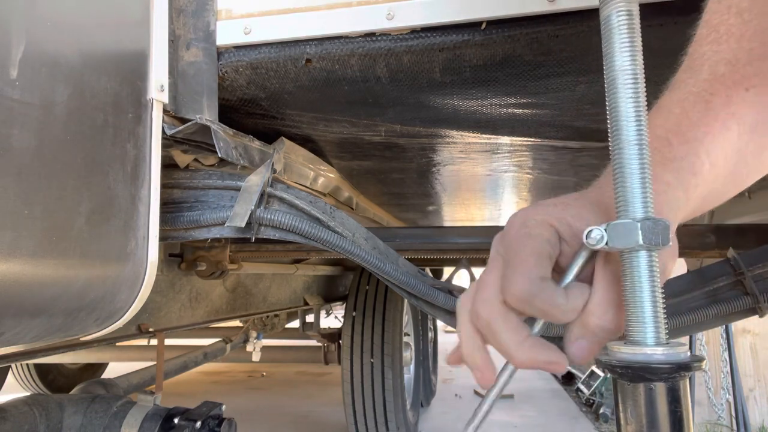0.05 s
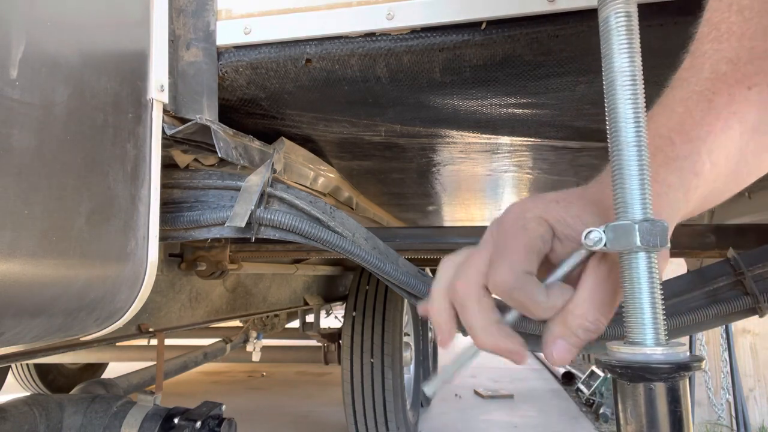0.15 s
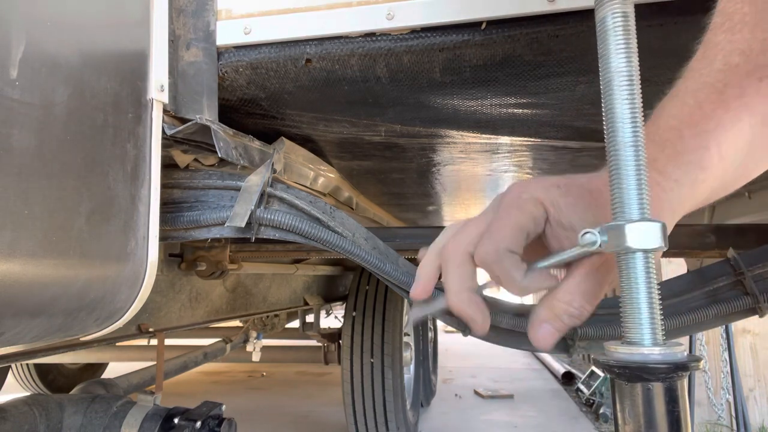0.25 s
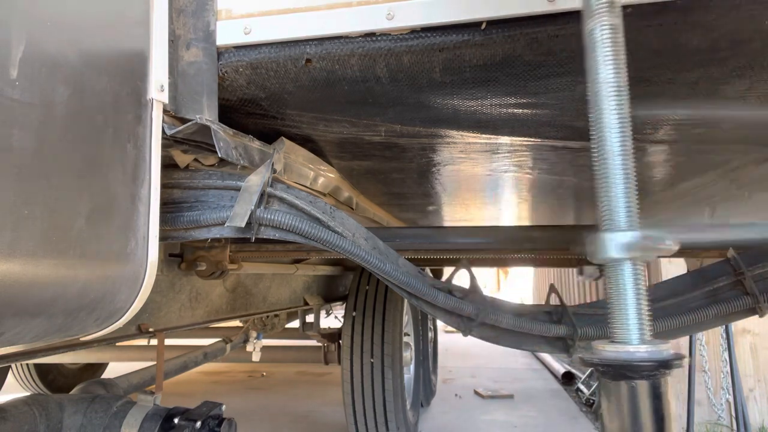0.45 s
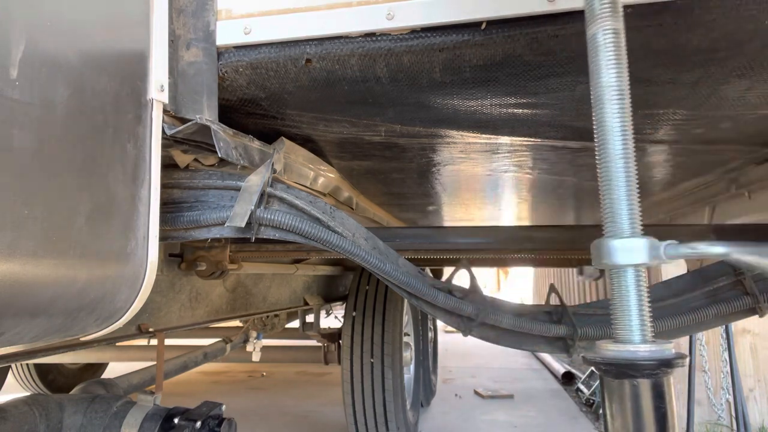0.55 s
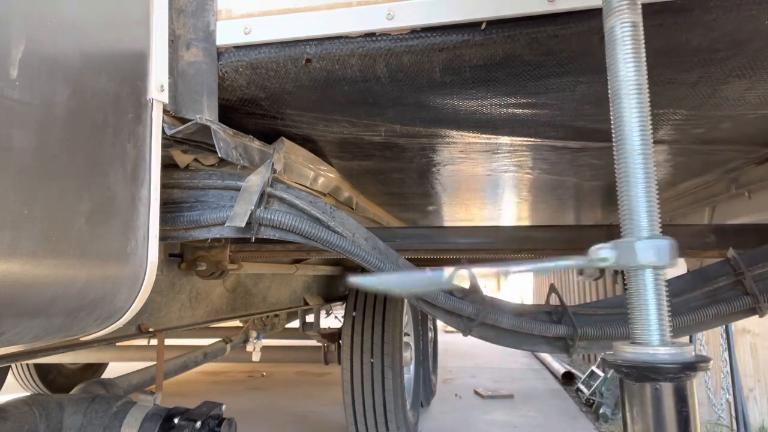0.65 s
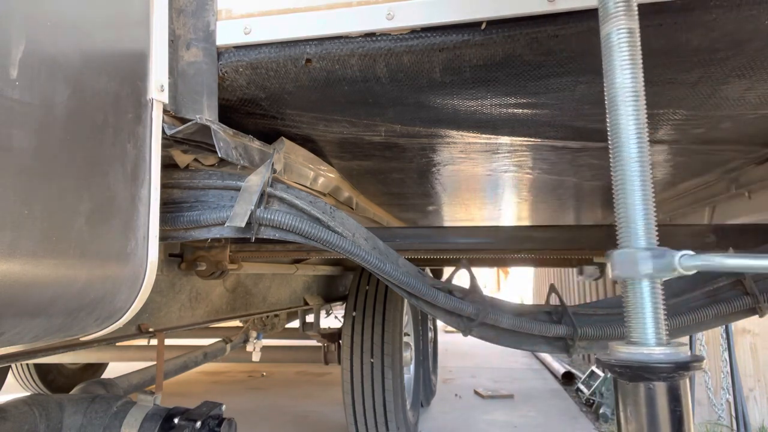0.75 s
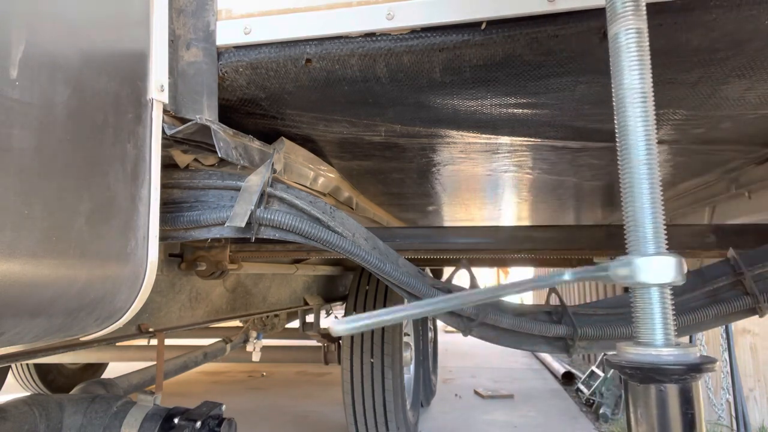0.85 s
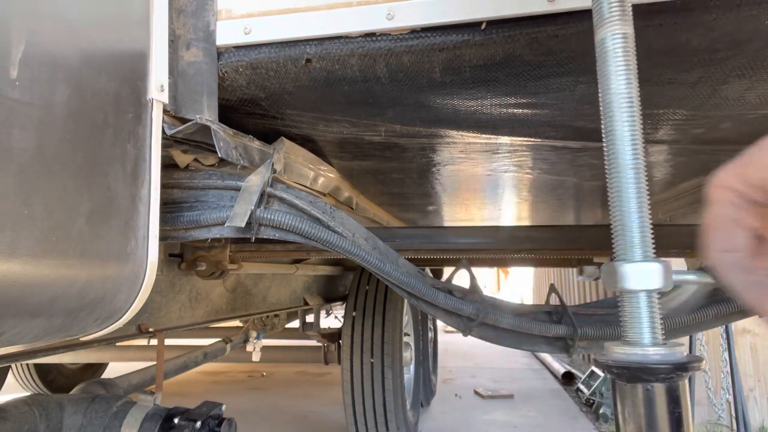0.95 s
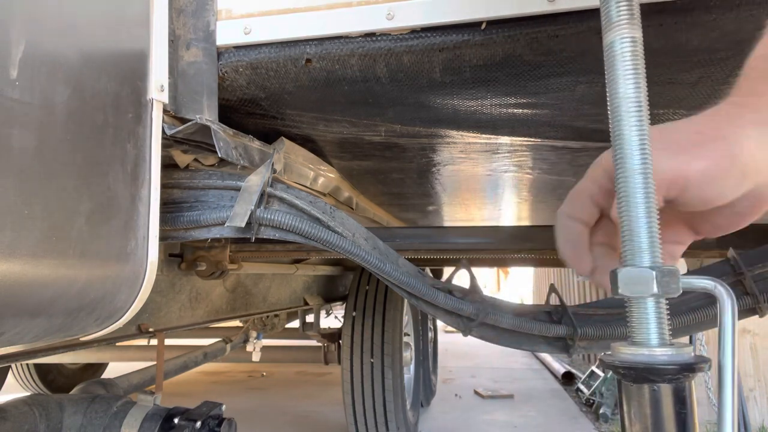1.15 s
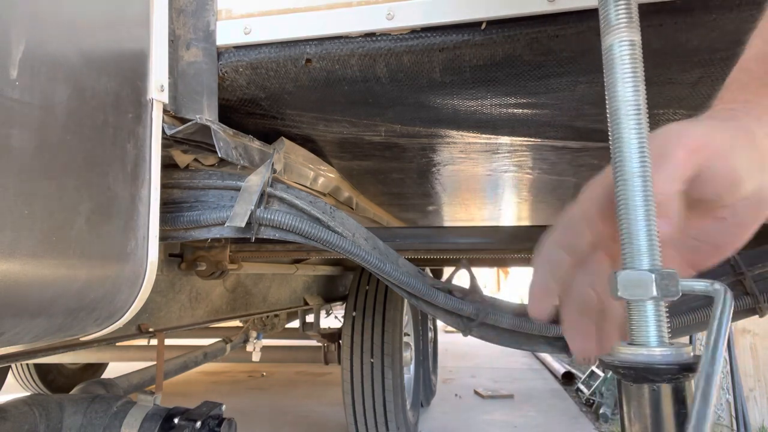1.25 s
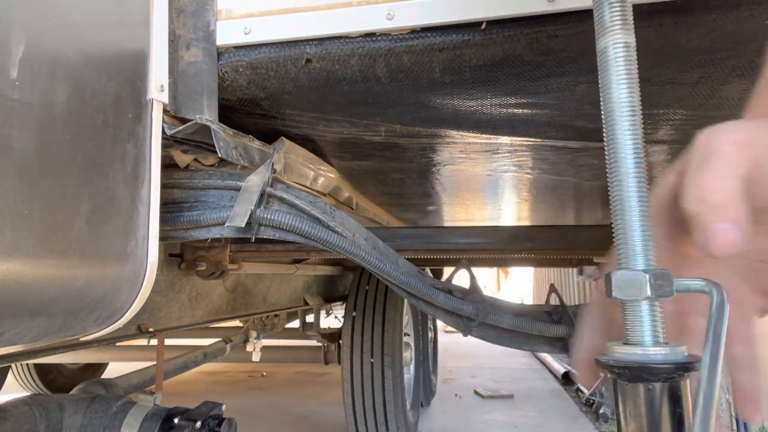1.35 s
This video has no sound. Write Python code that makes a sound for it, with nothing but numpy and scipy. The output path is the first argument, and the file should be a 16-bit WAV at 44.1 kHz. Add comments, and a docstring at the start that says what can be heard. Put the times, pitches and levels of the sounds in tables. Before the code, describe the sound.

A steel crank on a threaded jack rod is flicked by hand: soft finger brush, tiny high squeak, a clink, then a dense burst of bright clashes and rattle thinning out. Close stereo microphone, quiet outdoors, distant birds.

```python
"""A distant dove coos and a small bird chirps over a low rumble; fingers brush a steel crank close by.
Flicked round the threaded rod of a trailer jack, its dry nut squeaks by stick-slip and the handle clinks.
Swinging free, it clashes on the rod and rattles along the thread until a hand catches it.
Force impulses excite the decaying modes of rod, handle and steelwork; a bending wave disperses as a sweep.
Ticks, brushes and air are filtered noise; the birds are gliding sines with an echo."""
import sys
import numpy as np
from scipy import signal
from scipy.fft import rfft, irfft
from scipy.io import wavfile

SR = 44100
rng = np.random.default_rng(int(sys.argv[2]) if len(sys.argv) > 2 else 0)


def waveform_to_disk(signal):
    """Save audio, clipped to [-1, 1], as 16-bit WAV at the path in sys.argv[1]."""
    frames = np.transpose(np.atleast_2d(signal))
    scaled = np.clip(frames, -1, 1) * 32767
    samples = np.round(scaled).astype(np.int16)
    wavfile.write(sys.argv[1], SR, samples)


N = 61739
T = np.arange(N) / SR   # time [s]

# The nut strikes the rod: (time [s], level [dB], extra below 4.5 kHz [dB], extra above 9 kHz [dB],
# resonance of the contact [Hz])
ROD_CLASHES = [(.3655, -30, -0.5, -32, 5440), (.3705, -28.5, -4, -32, 5680), (.388, -39, 11.5, -24.5, 3250),
               (.4428, -23.5, 6.5, -11, 2490), (.451, -14, -2.5, 5.5, 2380), (.4625, -13, -6, 3, 6120),
               (.471, -23.5, -6, 9.5, 5700), (.488, -23, -7, -17, 6080), (.4965, -19, -20, 9, 5820),
               (.504, -21, 2, 9, 7270), (.516, -21, -15.5, 11, 7500), (.5428, -23, 3, 3, 2566),
               (.556, -19, -7.5, -16, 5380), (.575, -28, -5, -20, 5700), (.583, -16, -17, -2, 7200),
               (.597, -24.5, 1, 2, 1020), (.66, -33, 0, 7.5, 3900), (.685, -32, -9, 13.5, 7100),
               (.703, -36, 4, 14.5, 6000), (.734, -30.5, -5.5, -22, 6020), (.774, -35, -4, 17, 7550),
               (.781, -38, 7.5, 9, 2390), (.797, -33, 1, -9, 3850), (.837, -38.5, 4.5, 6.5, 2890),
               (.985, -42, 6, 9, 4130)]
# Light knocks on the handle: (time [s], level [dB], extra below 4.5 kHz [dB], extra above 9 kHz [dB])
HANDLE_CLINKS = [(.3105, -33.5, 0, -10.5), (.971, -52.5, 11.5, -21), (1.017, -62, 10.5, -1),
                 (1.087, -55, 7.5, -8), (1.131, -52, 1, -13), (1.141, -44, 2.5, -16), (1.367, -64, 6, 6.5)]
# Strength of the nut's rattle along the thread: (time [s], level [dB])
RATTLE_LEVEL = [(.36, -46), (.39, -54), (.435, -32.5), (.46, -19), (.515, -30), (.535, -59), (.6, -37.5),
                (.64, -37), (.7, -36.5), (.76, -41), (.805, -37), (.83, -56.5), (.91, -53), (.96, -50),
                (1.04, -64), (1.2, -91.5)]
# Modes of rod and jack, one list per column: (frequency [Hz]), (level [dB]), (decay time T60 [s])
ROD_MODE_HZ = [900, 985, 1050, 1630, 1722, 2376, 2860, 3630, 3751, 4445, 5115, 5259, 5511, 5680, 5907, 6227,
               6378, 6715, 7057, 7780, 9646]
ROD_MODE_DB = [-19.5, -15.5, -23.5, -16.5, -17.5, -11.5, -20, -20, -18.5, -13.5, -16.5, -22, -16.5, -17,
               -14, -18.5, -15.5, -31.5, -20.5, -9, -24.5]
ROD_MODE_T60_S = [.15, 0.29, 0.46, .22, 0.26, 0.13, 0.29, 0.25, 0.2, .3, .4, 0.31, 0.3, .3, 0.43, 0.35,
                  0.44, 0.69, 0.46, .4, 0.24]
# Modes of the handle, one list per column: (frequency [Hz]), (level [dB]), (decay time T60 [s])
HANDLE_MODE_HZ = [2112, 2545, 2977, 3196, 3822, 4130, 4872, 5972, 7258, 8467, 10640]
HANDLE_MODE_DB = [-3, -2, -5.5, -3.5, 0.5, -8, -6.5, 4, -3.5, -11, -28.5]
HANDLE_MODE_T60_S = [.18, 0.28, 0.18, 0.19, 0.12, 0.1, 0.46, 0.19, .42, .3, 0.98]
# Relative spectrum of the many short modes of the steelwork: (frequency [Hz], level [dB per Hz])
STEEL_SPECTRUM = [(200, -14.5), (600, -10), (1000, -5.5), (1350, -8), (2600, 0), (3250, -2), (3750, 8),
                  (4200, -5), (4600, 1.5), (6000, 4.5), (7300, 3), (8100, -16.5), (10400, -9.5),
                  (11500, -24.5), (13100, -11.5), (13900, -24), (15000, -36.5), (16000, -45.5)]
# Spectrum of the bending wave: (frequency [Hz], level [dB])
BEND_SPECTRUM = [(40, -53.5), (70, -36.5), (130, -33.5), (250, -26), (500, -22.5), (1100, -20.5),
                 (2500, -45.5)]
# Strength of the nut's squeak: (time [s], level [dB])
SQUEAK_LEVEL = [(.183, -70), (.197, -31.5), (.204, -38), (.212, -34), (.217, -25.5), (.223, -33.5),
                (.235, -33), (.245, -32.5), (.256, -42), (.29, -63)]
# Dry ticks of the hand on the handle: (time [s], level without the tail [dB], top frequency [Hz])
HAND_TICKS = [(0.3085, -46, 12000), (0.9691, -30, 5560)]
# Fingers brush and bump the handle:
# (time [s], level [dB], low edge [Hz], high edge [Hz], decay time T60 [s])
FINGER_BRUSHES = [(0.091, -47, 90, 910, 0.24), (0.204, -53.5, 900, 2130, 0.94),
                  (0.84, -42, 1004, 1113, 0.21), (1.361, -53, 390, 1500, 0.7)]
# Notes of the dove: (start [s], length [s], start pitch [Hz], end pitch [Hz], level [dB])
DOVE_COOS = [(-.08, 0.258, 551.6, 494.4, -51.5), (1.06, 0.096, 510, 554, -58),
             (1.175, 0.049, 646, 641, -50), (1.335, .1, 575, 625, -54.5)]
# Notes of the small bird: (start [s], length [s], start pitch [Hz], end pitch [Hz], level [dB])
BIRD_CHIRPS = [(.033, .04, 2820, 2280, -60), (.158, 0.038, 2710, 2507, -56.5),
               (1.236, 0.037, 2920, 2172, -56), (1.274, .04, 2200, 3060, -55.5)]
# Relative spectrum of the open air: (frequency [Hz], level [dB per Hz])
AIR_SPECTRUM = [(25, -22.5), (50, -5), (80, 1.5), (130, -5), (300, -18), (600, -14), (1000, -33),
                (2800, -27.5), (4200, -39.5), (7000, -39), (8500, -52), (12800, -48.5), (14200, -65.5)]
# Phase between the two channels, the left one lagging more as pitch rises and swinging between antiphase and
# in-phase above 8 kHz: (frequency [Hz], phase by which left leads [rad])
STEREO_PHASE = [(0, 0), (650, -2.8), (1000, -1.5), (1400, -2.8), (2000, -3.3), (3200, -6.3), (3700, -6.5),
                (4300, -9), (5000, -9.6), (6000, -12.5), (6800, -15), (8100, -15.7), (9500, -15.7),
                (10900, -12.6), (12400, -12.6), (13600, -9.4)]
# Level difference of the channels: (frequency [Hz], left minus right [dB])
STEREO_BALANCE = [(60, -17.5), (300, -3.5), (700, -6.5), (1290, -2), (2380, -2), (4400, 0), (8120, 1)]
# Scale of the phase variation between channels from mode to mode: (frequency [Hz], phase [rad])
STEREO_SPREAD = [(200, 1), (1000, 1.92), (7000, 2.1), (8200, .2), (16000, .3)]

# Micro-bounces after each contact: mean rate, e-fold time, size relative to the first click
BOUNCES_PER_S, BOUNCE_DECAY_S, BOUNCE_SIZE = 1500, 0.0023, 0.51
CONTACT_RING_DB, CONTACT_WIDTH_HZ = 2.5, 150
RATTLES_PER_S, RATTLE_SPREAD_DB = 330, 7
HANDLE_SHARE_DB = -13   # how much a blow on the rod shakes the handle
# Central decay time, spread of its natural logarithm, spread of mode levels
STEEL_T60_S, STEEL_LOG_T60_SPREAD, STEEL_SPREAD_DB = 0.12, 0.19, 7
ROD_STEEL_DB, HANDLE_STEEL_DB = 2, 4   # steelwork added to rod and to handle
BEND_START_S, BEND_SPREAD = .458, .29   # each frequency is delayed by BEND_SPREAD / sqrt(Hz) [s]
SQUEAK_HZ, SQUEAK_WOBBLE_HZ, SQUEAK_JITTER_HZ = 6770, 55, 70
SQUEAK_OCTAVE_DB, SQUEAK_FLUTTER_DB = -13, 1.2
TICK_T60_S, TICK_TAIL_DB, TICK_TAIL_T60_S = 0.006, -5.5, 0.042
BRUSH_ATTACK_S = 0.0031
BIRD_WAVER, BIRD_ECHO_DB, BIRD_ECHO_T60_S = .012, -10, .2   # waver is a fraction of the pitch
AIR_DB, AIR_CORRELATION, AIR_PAN_DB = -52.5, 0.67, 0
CUTOFF_HZ = 15900


def from_db(db):
    """Logarithmic level: decibels to amplitude gain."""
    return 10 ** (np.asarray(db) / 20)


def rms_one(x):
    """Normalisation of power: scale to unit rms."""
    return x / np.sqrt(np.mean(x ** 2) + 1e-20)


def curve(points, at):
    """Linear interpolation of a two-column table."""
    return np.interp(at, *np.transpose(points))


def at_hz(points, hz):
    """Interpolation of a spectrum on a logarithmic frequency axis."""
    f, value = np.transpose(points)
    return np.interp(np.log(hz + 1), np.log(f + 1), value)


def filtered(x, hz, kind, order=2):
    """Butterworth filtering: a maximally flat passband."""
    sos = signal.butter(order, np.minimum(hz, SR / 2 - 1), kind, fs=SR, output="sos")
    return signal.sosfilt(sos, x + 1e-18)


def drift(rate_hz):
    """Low-passed noise as a random fluctuation of unit rms."""
    noise = rng.standard_normal(2 * N)
    return rms_one(filtered(noise, rate_hz, "low")[N:])   # skip the filter's onset


def through(x, response):
    """Linear superposition: convolve a signal with a stereo impulse response."""
    return signal.fftconvolve(np.atleast_2d(x), response, axes=1)[:, :N]


def in_stereo(hz, wave, scatter=0):
    """Interaural-like cues: level and phase differences of a complex partial between left and right."""
    # Each channel takes half the difference, with opposite sign
    gain = from_db(at_hz(STEREO_BALANCE, hz) / 2)
    half = gain * np.exp(.5j * (curve(STEREO_PHASE, hz) + scatter))
    return np.array([(wave * half).real, (wave / half).real])


def contacts(rows, size=2048):
    """Impulsive contact: a click and dying micro-bounces, coloured by where and how hard it lands."""
    out, t = np.zeros(N + size), T[:size]
    for s, db, low_db, high_db, *resonance in rows:
        bounces = rng.random(size) < BOUNCES_PER_S / SR
        hit = BOUNCE_SIZE * rng.standard_normal(size) * bounces * np.exp(-t / BOUNCE_DECAY_S)
        hit[0] = 1
        hit = hit / np.linalg.norm(hit)
        for hz in resonance:
            peak = signal.iirpeak(hz, hz / CONTACT_WIDTH_HZ, fs=SR)
            hit = hit + from_db(CONTACT_RING_DB) * signal.lfilter(*peak, hit)
        low = filtered(hit, 4500, "low", order=3)
        high = filtered(hit, 4500, "high", order=3)
        middle = filtered(high, 9000, "low", order=3)
        top = filtered(high, 9000, "high", order=3)
        start = int(s * SR)
        force = from_db(low_db) * low + middle + from_db(high_db) * top
        out[start:start + size] += from_db(db) * force
    return out[:N]


def thread_rattle():
    """Random impulse train: the nut chatters over the thread in small uneven clicks."""
    sizes = from_db(RATTLE_SPREAD_DB * np.clip(rng.standard_normal(N), -2, 2))
    signs = rng.choice([-1, 1], N)
    clicks = rms_one(sizes * signs * (rng.random(N) < RATTLES_PER_S / SR))
    # Allow for the energy each click gains by ringing in the steelwork
    ring_samples = STEEL_T60_S * SR / np.log(1e6)
    started = T > RATTLE_LEVEL[0][0]
    return clicks * started * from_db(curve(RATTLE_LEVEL, T)) / np.sqrt(ring_samples)


def ringing(modes, scatter):
    """Modal superposition: a stereo response of exponentially decaying partials."""
    out = np.zeros((2, N))
    chances = rng.uniform(-0.85, 1, (len(modes), 2))
    for (hz, db, t60), (turn, skew) in zip(modes, chances):
        t = T[:int(1.2 * t60 * SR)]
        decay = np.log(1000) / t60
        wave = from_db(db) * np.exp((2j * np.pi * hz - decay) * t + 1j * np.pi * turn)
        out[:, :len(t)] += in_stereo(hz, wave, scatter * skew * at_hz(STEREO_SPREAD, hz))
    return out


def steelwork(count=360):
    """High modal density: a crowd of short partials whose sum starts near unit rms."""
    places = (np.arange(count) + rng.random(count)) / count
    hz = 200 + places * (CUTOFF_HZ - 200)
    db = at_hz(STEEL_SPECTRUM, hz) + STEEL_SPREAD_DB * rng.uniform(-1.2, 1, count)
    db = db - 10 * np.log10(np.sum(from_db(db) ** 2) / 2)
    t60 = STEEL_T60_S * np.exp(STEEL_LOG_T60_SPREAD * rng.uniform(-1.13, 1, count))
    return ringing(np.transpose([hz, db, t60]), scatter=0.99)


def jack():
    """Forced modal vibration: clashes and rattle drive rod and handle, clinks drive the handle."""
    steel = steelwork()
    handle_modes = np.transpose([HANDLE_MODE_HZ, HANDLE_MODE_DB, HANDLE_MODE_T60_S])
    rod_modes = np.transpose([ROD_MODE_HZ, ROD_MODE_DB, ROD_MODE_T60_S])
    handle = ringing(handle_modes, scatter=0.72)
    rod = ringing(rod_modes, scatter=0.96)
    struck_rod = rod + from_db(ROD_STEEL_DB) * steel + from_db(HANDLE_SHARE_DB) * handle
    struck_handle = handle + from_db(HANDLE_STEEL_DB) * steel
    rod_force = contacts(ROD_CLASHES) + thread_rattle()
    return through(rod_force, struck_rod) + through(contacts(HANDLE_CLINKS), struck_handle)


def bending_wave():
    """Dispersion: high frequencies travel faster along the rod, so a blow arrives as a falling sweep."""
    delay = np.maximum(T - BEND_START_S, 1e-6)
    hz = np.minimum((BEND_SPREAD / delay) ** 2, SR / 2)
    in_band = hz < BEND_SPECTRUM[-1][0]
    low_fade = np.minimum(hz / BEND_SPECTRUM[0][0], 1) ** 2
    gain = from_db(at_hz(BEND_SPECTRUM, hz)) * in_band * low_fade
    return in_stereo(hz, gain * np.exp(2j * np.pi * np.cumsum(hz) / SR))


def squeak():
    """Stick-slip friction: the dry nut gives a wavering whistle and its octave."""
    hz = SQUEAK_HZ + SQUEAK_WOBBLE_HZ * drift(60) + SQUEAK_JITTER_HZ * drift(500)
    phase = 2 * np.pi * np.cumsum(hz) / SR
    sounding = (T > SQUEAK_LEVEL[0][0]) * (T < SQUEAK_LEVEL[-1][0])
    gain = from_db(curve(SQUEAK_LEVEL, T) + SQUEAK_FLUTTER_DB * drift(100)) * sounding
    octave = from_db(SQUEAK_OCTAVE_DB + 2 * drift(120)) * np.sin(2 * phase)
    opposite_sides = from_db([[-1], [1]])   # left 1 dB down, right 1 dB up
    return np.sqrt(2) * gain * (np.sin(phase) + octave) * opposite_sides


def ticks():
    """Damped impact noise: short dull cracks, each with a weaker tail."""
    out = np.zeros((2, N))
    for s, db, top_hz in HAND_TICKS:
        age = np.maximum(T - s, 0)
        crack = from_db(-60 * age / TICK_T60_S)
        tail = from_db(TICK_TAIL_DB - 60 * age / TICK_TAIL_T60_S)
        noise = rms_one(filtered(rng.standard_normal((2, N)), top_hz, "low", order=1))
        out += from_db(db) * (T >= s) * (crack + tail) * noise
    return filtered(out, 76, "high")


def brushes():
    """Friction noise: soft, band-limited contacts that swell quickly and decay."""
    out = np.zeros((2, N))
    for s, db, low_hz, high_hz, t60 in FINGER_BRUSHES:
        age = np.maximum(T - s, 0)
        noise = rms_one(filtered(rng.standard_normal((2, N)), [low_hz, high_hz], "band"))
        out += noise * np.minimum(age / BRUSH_ATTACK_S, 1) * from_db(db - 60 * age / t60)
    return out


def bird(notes):
    """Frequency modulation and diffuse reflection: distant gliding whistles with a noise-like echo."""
    song, waver = np.zeros(N), 1 + BIRD_WAVER * drift(120)
    for s, length, start_hz, end_hz, db in notes:
        progress = np.clip((T - s) / length, 0, 1)
        hz = (start_hz + (end_hz - start_hz) * progress) * waver
        swell = np.sqrt(np.abs(np.sin(np.pi * progress)))
        song += from_db(db) * swell * np.sin(2 * np.pi * np.cumsum(hz) / SR)
    echo = rng.standard_normal((2, N)) * from_db(-60 * T / BIRD_ECHO_T60_S)
    echo = echo / np.linalg.norm(echo[0])
    return song + from_db(BIRD_ECHO_DB) * through(song, echo)


def open_air():
    """Partly correlated stationary noise: a steady far rumble and faint hiss."""
    gain = from_db(at_hz(AIR_SPECTRUM, np.fft.rfftfreq(N, 1 / SR)))
    mid, side = irfft(rfft(rng.standard_normal((2, N))) * gain, N)
    signs = np.array([[1], [-1]])   # left, right
    stereo = np.sqrt(1 + AIR_CORRELATION) * mid + np.sqrt(1 - AIR_CORRELATION) * side * signs
    return from_db(AIR_DB + AIR_PAN_DB * signs) * rms_one(stereo)


def scene():
    """Superposition of sources: the jack in front, birds and air behind."""
    near = jack() + bending_wave() + squeak() + ticks() + brushes()
    far = bird(DOVE_COOS) + bird(BIRD_CHIRPS) + open_air()
    return near + far


def record(dry):
    """Band limitation: an elliptic low-pass cuts the top steeply."""
    sos = signal.ellip(10, .1, 80, CUTOFF_HZ, fs=SR, output="sos")   # 0.1 dB ripple, 80 dB stopband
    return signal.sosfilt(sos, dry)


dry = scene()
out = record(dry)
waveform_to_disk(out)
```